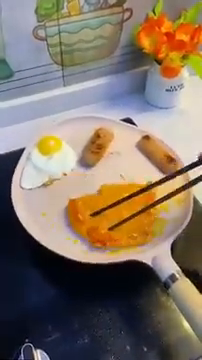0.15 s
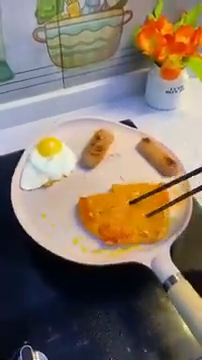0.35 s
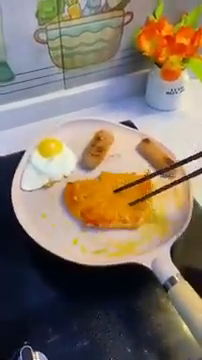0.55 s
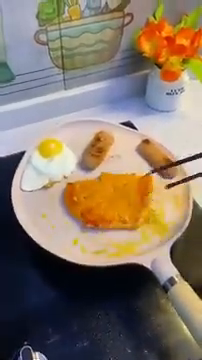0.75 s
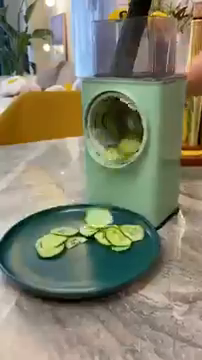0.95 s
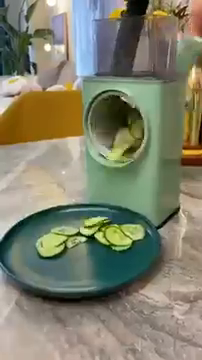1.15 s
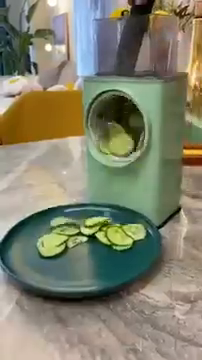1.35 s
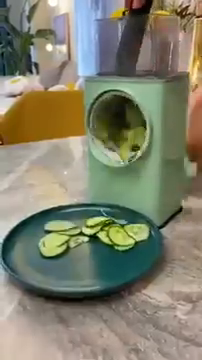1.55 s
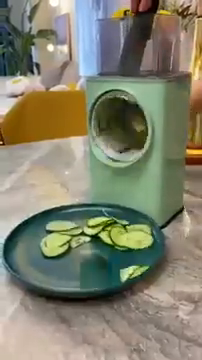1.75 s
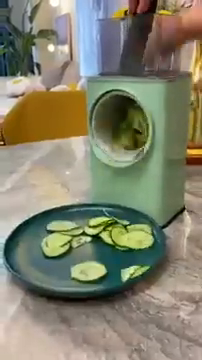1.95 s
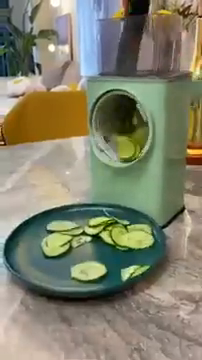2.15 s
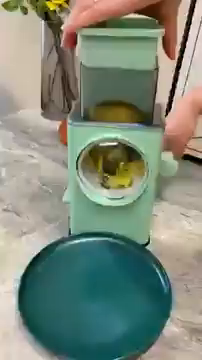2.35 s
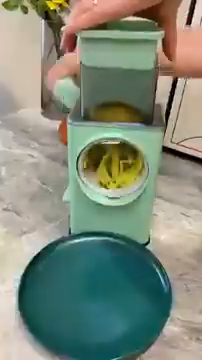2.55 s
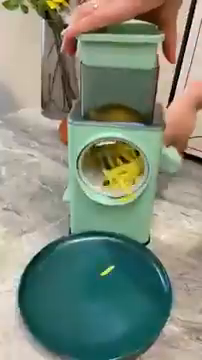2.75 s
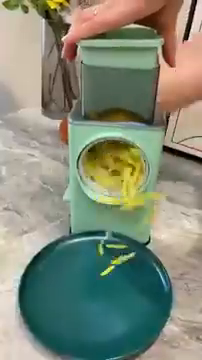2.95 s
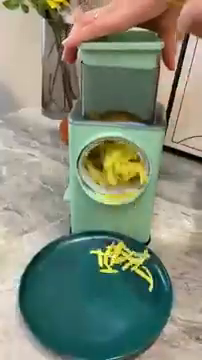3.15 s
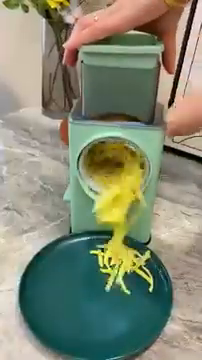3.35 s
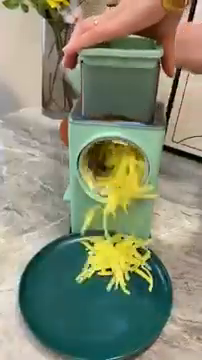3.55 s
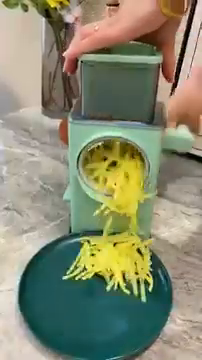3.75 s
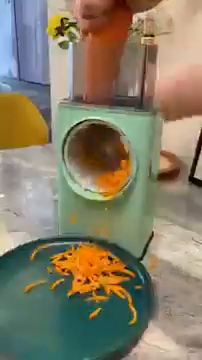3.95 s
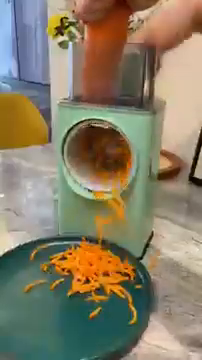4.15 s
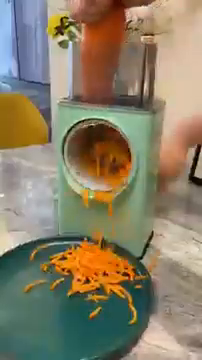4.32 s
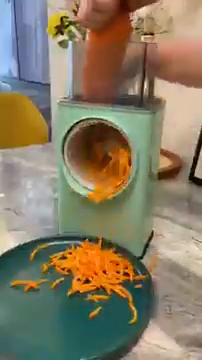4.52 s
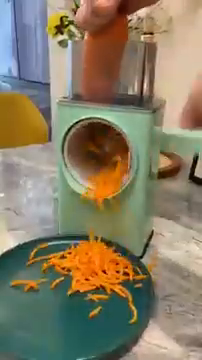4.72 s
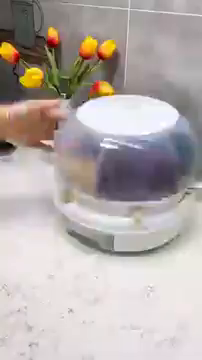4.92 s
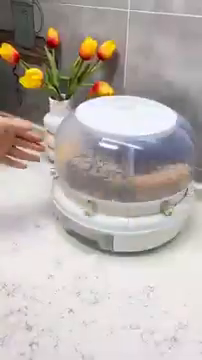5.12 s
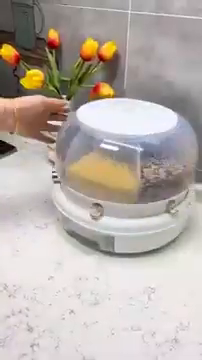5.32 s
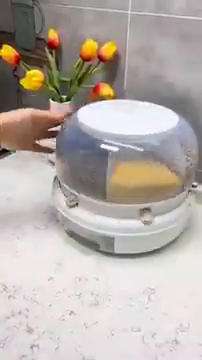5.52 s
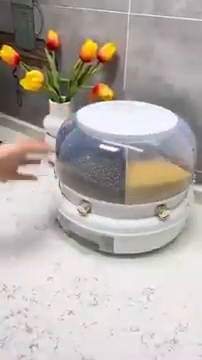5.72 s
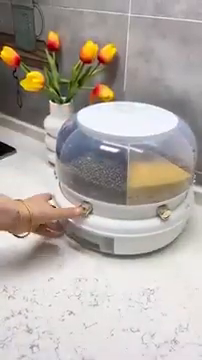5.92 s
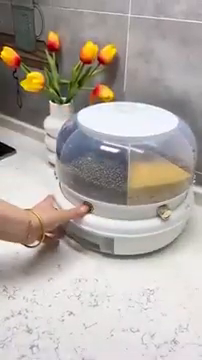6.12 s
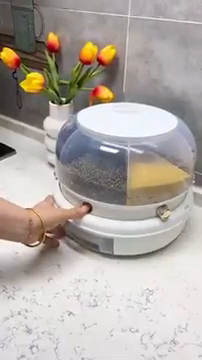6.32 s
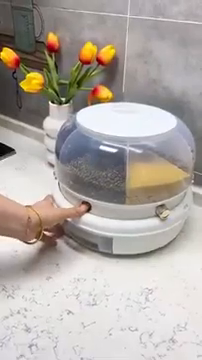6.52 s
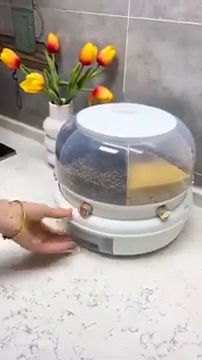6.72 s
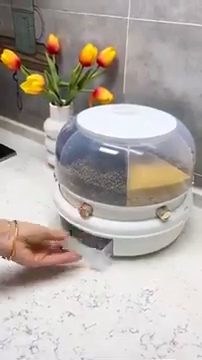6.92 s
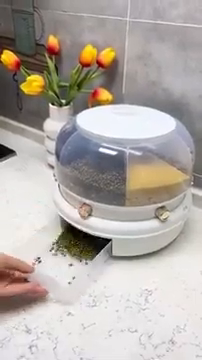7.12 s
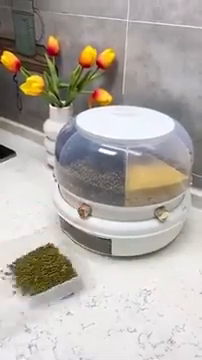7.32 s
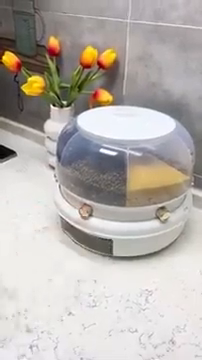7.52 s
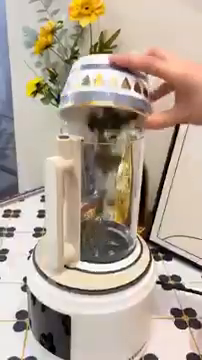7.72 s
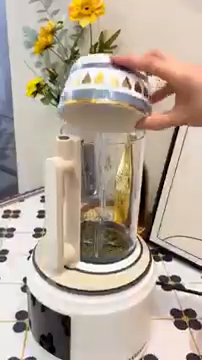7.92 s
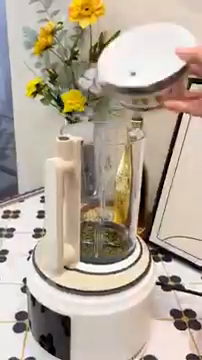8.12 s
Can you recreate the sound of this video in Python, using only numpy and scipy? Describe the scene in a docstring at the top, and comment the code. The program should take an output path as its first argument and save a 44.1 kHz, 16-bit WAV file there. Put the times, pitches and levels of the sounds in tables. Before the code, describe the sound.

Close kitchen sounds: hot fat sizzling, grating strokes growing harsher, a rolling plastic dispenser, beans raining down, drawer knocks, and a bowl squeaking on glass.

```python
"""A hand-cranked drum grater slices cucumber, then shreds potato and carrot, one rasp for each blade pass.
Short kitchen scenes surround it. First a cutlet sizzles as bursting droplets while it is pushed round a pan.
Later a plastic grain dispenser is turned, pours beans into its drawer, and the drawer is pulled out.
Last, a bowl knocks on a glass jug and tips the beans in. Tiny random impacts make the grains and rasps;
ringing bodies make the knocks, and filtered noise makes the low rumble."""
import sys
import numpy as np
from scipy import signal
from scipy.fft import rfft, irfft, next_fast_len
from scipy.io import wavfile
from scipy.ndimage import uniform_filter1d, map_coordinates

SR = 44100
rng = np.random.default_rng(int(sys.argv[2]) if len(sys.argv) > 2 else 0)


def to_wav(sig):
    """Store sig (one row per channel, or 1-D mono) as 16-bit WAV at the path in sys.argv[1].

    Samples outside -1..1 are clipped; the rate is SR.
    """
    pcm = np.clip(np.atleast_2d(sig), -1, 1) * 32767
    pcm = np.round(pcm).astype(np.int16)
    wavfile.write(sys.argv[1], SR, pcm.T)  # frames by channels


N = 360297
TIME = np.arange(N) / SR
SIZE = 2 * next_fast_len(N // 2 + SR // 4)  # transform length, with room for ringing
FREQ = np.fft.rfftfreq(SIZE, 1 / SR)

# tone of the rolling turntable, also heard as the drawer's drumming: pitch_hz [Hz], level_db [dB per Hz]
ROLLING_TONE = [(71, -55), (120, -19), (165, -23), (205, -1.5), (248, 0.5), (290, -7), (330, -4.5),
                (390, -12), (611, -17), (983, -17.5), (1500, -26.5), (1950, -67), (3300, -120)]
# tone of beans striking plastic: pitch_hz [Hz], level_db [dB per Hz]
BEAN_TONE = [(180, -22.5), (300, -40), (392, -15.5), (502, -4), (713, -5.5), (787, 3), (856, -2.5),
             (1230, -1), (1340, -6.5), (2000, 2.5), (2930, 1), (3900, -0.5), (6740, -10.5), (13300, -16.5),
             (16000, -21)]


def amp(db):
    """Turn decibels into gain."""
    return 10 ** (np.asarray(db) / 20)


def unit(x):
    """Scale to an rms of 1."""
    return x / np.sqrt(np.mean(x ** 2) + 1e-20)


def along(points, hz):
    """Read a curve of (Hz, value) points on a log pitch axis."""
    pitch_hz, value = np.transpose(points)
    return np.interp(np.log(hz + 1), np.log(pitch_hz), value)


def wobble(rate):
    """A smooth random curve with the given number of knots a second."""
    knots = rng.standard_normal(int(N * rate / SR) + 4)
    return map_coordinates(knots, [TIME * rate])


def filtered(x, response):
    """Pass x through a frequency response."""
    return irfft(rfft(x, SIZE) * response, SIZE)[..., :N]


def colour(points):
    """A filter with the given (Hz, dB) shape that only rings after a sound, never before it."""
    cepstrum = irfft(np.log(np.maximum(amp(along(points, FREQ)), 1e-6)))
    # folding the second half onto the first puts all the ringing after the hit
    cepstrum[1:SIZE // 2] *= 2
    cepstrum[SIZE // 2 + 1:] = 0
    return np.exp(rfft(cepstrum))


def body(modes):
    """The ringing of an object with (Hz, width Hz, dB) resonances, alternating in sign."""
    response = 0
    for k, (centre, width, db) in enumerate(modes):
        damping = 1j * FREQ * width
        response = response + (-1) ** k * amp(db) * damping / (centre * centre - FREQ ** 2 + damping)
    return response


def grains(response, rate, spread_db, clump_db, clump_rate=90):
    """Tiny impacts, rate a second, of random size and in louder clumps, through a response; rms 1."""
    hits = (rng.random(N) < rate / SR) * np.sign(rng.standard_normal(N))
    spread = spread_db * np.clip(rng.standard_normal(N), -2, 2)
    sizes = amp(spread + clump_db * wobble(clump_rate))
    return unit(filtered(hits * sizes, response))


def shifting(x, depth_db):
    """The colour of x drifts at random in patches of time and pitch; rms 1."""
    spectrum = signal.stft(x, nperseg=1024)[2]
    patches = uniform_filter1d(rng.standard_normal(spectrum.shape), size=7, axis=0)
    patches = uniform_filter1d(patches, size=7, axis=1)
    return unit(signal.istft(spectrum * amp(depth_db * unit(patches)), nperseg=1024)[1][:N])


def swells(rows, attack, release, sag_db_per_s=0):
    """Gain for (start, end, dB) rows: each rises, holds or sags, and dies away; overlaps add in power."""
    power = np.zeros(N)
    for start, end, db in rows:
        age = np.maximum(TIME - start, 0)
        after = np.maximum(TIME - end, 0)
        gain = amp(db - sag_db_per_s * age) * (1 - np.exp(-age / attack)) * np.exp(-after / release)
        power += gain ** 2
    return np.sqrt(power)


def strikes(rows, modes, ring_db, tick_db, tick_t60, chatter, bright):
    """Each contact rings its own mix of modes, chatters for a moment and gives off a bright tick."""
    t = TIME[:SR // 4]
    radiation = 1j * FREQ / (1j * FREQ + 0.65 * modes[0][0])  # a small body gives off little bass
    rings = [(-1) ** k * irfft(body([mode]) * radiation)[:len(t)] for k, mode in enumerate(modes)]
    tick = irfft(colour(bright))[:len(t)]
    out = np.zeros(N + SR)
    for start, db, rel_db, *_ in rows:
        rattle = rng.standard_normal(len(t)) * amp(-60 * t / 0.035)
        snap = rng.standard_normal(len(t)) * amp(-60 * t / tick_t60)
        ring = amp(rng.normal(0, 1.8, len(modes))) @ np.array(rings)
        knock = signal.fftconvolve((t == 0) + chatter * rattle, ring)[:len(t)]
        crack = signal.fftconvolve(snap, tick)[:len(t)]
        here = out[round(start * SR):][:len(t)]
        here += amp(db + ring_db) * knock / abs(knock).max()
        here += amp(db + rel_db + tick_db) * crack / abs(crack).max()
    return out[:N]


def thuds(rows, modes):
    """Soft blows that only ring the given low modes."""
    blows = np.zeros(N)
    for start, db in rows:
        blows[round(start * SR)] = amp(db)
    response = body(modes)
    return filtered(blows, response) / abs(irfft(response)).max()


def plops(rows, t60, plop_db, attack=0.001):
    """Each blow pops in a hollow body as a dying sine at its own pitch."""
    t, out = TIME[:SR // 4], np.zeros(N)
    for start, db, *_, hz in rows:
        fade = amp(db + plop_db - 60 * t / t60) * (1 - np.exp(-t / attack))
        out[round(start * SR):][:len(t)] += fade * np.sin(2 * np.pi * hz * t)
    return out


def background():
    """A low, uneven room rumble, stronger while things are handled, with a few soft bumps."""
    # rumble while things are moved on the worktop: start_s [s], end_s [s], level_db [dB]
    handling = [(2.33, 3.78, -49), (3.78, 4.9, -39), (5.1, 6.1, -40.5), (6.75, 7.48, -43.5),
                (7.56, 8.17, -43.5)]
    # tone of the rumble: pitch_hz [Hz], level_db [dB per Hz]
    rumble_tone = [(21, -25), (35, -12), (82, -7), (144, -7), (169, -11), (207, -10), (612, -15),
                   (1500, -23.5), (1950, -64), (3300, -120)]
    # soft bumps on the worktop: start_s [s], level_db [dB]
    bumps = [(5.983, -35), (7.564, -22.5), (8.074, -25), (8.148, -24.5)]
    # the worktop's resonances: pitch_hz [Hz], width_hz [Hz], level_db [dB]
    worktop = [(50, 25, 3), (81, 24, 10.5), (137, 30, -8)]
    floor_db, uneven_db = -60.5, 3
    level = np.hypot(amp(floor_db), swells(handling, attack=0.004, release=0.027))
    level = level * amp(uneven_db * wobble(18))
    rumble = unit(filtered(rng.standard_normal(N), colour(rumble_tone)))
    return level * rumble + thuds(bumps, worktop)


def pan():
    """Droplets burst in hot fat, more so at each push, and big ones spit; hob rumbles, chopsticks nudge."""
    # rough tone of the bursting droplets: pitch_hz [Hz], level_db [dB per Hz]
    fat_tone = [(120, -31), (200, -13), (262, -6.5), (383, -21.5), (494, -12.5), (560, -14), (734, -0.5),
                (963, -14.5), (1240, -13.5), (1570, -2), (2130, -5), (2600, -5.5), (3170, -2), (3700, -5.5),
                (5360, 0), (7400, -9), (9210, -3), (13500, -6.5), (15000, -13), (16000, -20)]
    # tone of the hob's rumble: pitch_hz [Hz], level_db [dB per Hz]
    hob_tone = [(21, -36), (35, 2.5), (107, -6.5), (146, 3), (215, -18), (258, -6.5), (365, -27),
                (400, -20), (520, -47), (880, -120)]
    # the cutlet pushed into hot fat: start_s [s], end_s [s], level_db [dB]
    presses = [(0.0, 0.048, -19), (0.125, 0.222, -23.5), (0.352, 0.422, -21), (0.51, 0.598, -21),
               (0.652, 0.75, -21)]
    # chopsticks on the pan: start_s [s], level_db [dB], tick_db [dB against the knock]
    nudges = [(0.04, -8, -1.5), (0.213, -6, -5), (0.358, -24.5, 16.5), (0.417, -27, -1), (0.585, -29, -2),
              (0.72, -21, 8)]
    # the pan rocking on the hob: start_s [s], level_db [dB]
    rocks = [(0.047, -14), (0.22, -22.5)]
    # the pan's resonances: pitch_hz [Hz], width_hz [Hz], level_db [dB]
    pan_modes = [(149.4, 12, -6), (199, 24, -9), (733, 37, 2.5), (1530, 120, -13), (3010, 340, -1)]
    end_s, sizzle_db, spits_db, hob_db = 0.7433, -23, -2, -29.5  # spits are set against the fizz
    sag_db_per_s = 10  # the rumble eases as the pan settles
    frying = swells([(0, end_s, 0)], attack=0.00031, release=0.0021)
    heat = frying * np.hypot(amp(sizzle_db), swells(presses, attack=0.00041, release=0.0021))
    fizz = grains(colour(fat_tone), rate=9000, spread_db=2.0, clump_db=0.3)
    spits = grains(colour(fat_tone), rate=420, spread_db=3.5, clump_db=0.5)
    sizzle = shifting(fizz + amp(spits_db) * spits, depth_db=1.7)
    hob = unit(filtered(rng.standard_normal(N), colour(hob_tone)))
    rumble = frying * amp(hob_db - sag_db_per_s * TIME) * hob
    knocks = strikes(nudges, pan_modes, ring_db=2.5, tick_db=5, tick_t60=0.013, chatter=0.1, bright=fat_tone)
    return heat * sizzle + rumble + knocks + thuds(rocks, pan_modes[:2])


def turntable():
    """The bins roll round and coast to rest while grain shifts inside; a hand rustles to the button."""
    # the push on the turntable, which then coasts: start_s [s], end_s [s], level_db [dB]
    spin = [(4.94, 5.24, -34)]
    # the rollers bumping: start_s [s], level_db [dB], pitch_hz [Hz]
    jolts = [(4.952, -24.5, 235), (5.032, -21, 212), (5.102, -23.5, 252), (5.232, -23, 254),
             (5.558, -30, 248)]
    # grain sliding in the bins: start_s [s], end_s [s], level_db [dB]
    shifts = [(5.02, 5.22, -47.5), (5.42, 5.495, -38)]
    # grain trickling all the while: start_s [s], end_s [s], level_db [dB]
    settling = [(4.93, 5.99, -49)]
    # tone of grain in the bins: pitch_hz [Hz], level_db [dB per Hz]
    bin_tone = [(470, -23), (800, -9), (978, -6.5), (1900, -6.5), (2470, -6.5), (3470, -10.5),
                (5500, -10.5), (7930, -21), (9810, -25), (16000, -30)]
    # the hand moving to the button: start_s [s], end_s [s], level_db [dB]
    rustles = [(5.71, 5.82, -46.5), (5.9, 5.95, -50.5)]
    # tone of the moving hand: pitch_hz [Hz], level_db [dB per Hz]
    skin_tone = [(4000, -12), (7500, 3), (12000, -5), (16000, -5)]
    roll = grains(colour(ROLLING_TONE), rate=900, spread_db=1.5, clump_db=1.6, clump_rate=15)
    roll = swells(spin, attack=0.0027, release=0.25) * roll
    bumping = plops(jolts, t60=0.077, plop_db=2.0, attack=0.0031)
    sliding = swells(shifts, attack=0.0075, release=0.036)
    trickling = swells(settling, attack=0.0061, release=0.02)
    grain = grains(colour(bin_tone), rate=7200, spread_db=1, clump_db=0.3)
    grain = amp(1.5) * np.hypot(sliding, trickling) * grain
    rustle = grains(colour(skin_tone), rate=1900, spread_db=1, clump_db=7.5)
    rustle = swells(rustles, attack=0.011, release=0.014) * rustle
    return roll + bumping + grain + rustle


def pour():
    """The shutter opens and beans rain into the drawer, drumming on its floor."""
    # the level dips briefly after the loud latch: start_s [s], end_s [s]
    dips = [(6.116, 6.15)]
    start_s, end_s, pour_db, dip_db = 5.99, 6.712, -17, -3
    opening_s, first_trickle_db, drumming_db = 0.11, -3, -20  # both levels are against full flow
    opening_db = first_trickle_db * np.clip(1 - (TIME - start_s) / opening_s, 0, 1)
    flow = amp(opening_db) * swells([(start_s, end_s, pour_db)], attack=0.0076, release=0.017)
    dip = swells([(start, end, 0) for start, end in dips], attack=0.0018, release=0.0067)
    level = flow * amp(dip_db * dip)
    rain = shifting(grains(colour(BEAN_TONE), rate=4500, spread_db=1, clump_db=0.3), depth_db=1.55)
    drumming = grains(colour(ROLLING_TONE), rate=900, spread_db=1.5, clump_db=0.8)
    return level * (amp(-0.95) * rain + amp(drumming_db) * drumming)


def slips(count):
    """The drawer sticks and slips in evenly spaced knocks: (start s, level dB, tick dB)."""
    start_s, spacing_s, level_db, tick_db = 6.993, 0.015, -14.5, -15.5
    return [(start_s + k * spacing_s, level_db, tick_db) for k in range(count)]


def drawer():
    """Button and shutter knock; each tug makes the drawer judder and sets the beans in it rolling."""
    # pulls on the drawer: start_s [s], end_s [s], rubbing_db [dB], beans_db [dB]
    tugs = [(6.759, 6.873, -38, -35.5), (6.897, 7.048, -31, -42.5), (7.143, 7.288, -37.5, -33),
            (7.387, 7.504, -39, -32.5)]
    # the drawer's edge grinding in its slot: start_s [s], end_s [s], level_db [dB]
    scrapes = [(6.801, 6.83, -18.5), (6.932, 6.944, -20), (6.992, 7.04, -23.5), (7.168, 7.205, -36),
               (7.238, 7.286, -30)]
    # tone of the grinding edge: pitch_hz [Hz], level_db [dB per Hz]
    edge_tone = [(100, -36), (200, 3.5), (330, -3), (450, 2.5), (850, -5.5), (1300, -15), (2200, -13),
                 (2900, -19), (5000, -23), (9000, -58)]
    # tone of beans rolling in the drawer: pitch_hz [Hz], level_db [dB per Hz]
    tray_tone = [(530, -83), (900, -9), (2140, -3), (2790, -9), (3680, -8), (5960, -13), (7860, -17.5),
                 (16000, -32)]
    # beans thrown against the wall as the drawer jerks free: start_s [s], end_s [s], level_db [dB]
    surges = [(7.232, 7.276, -22)]
    # button, shutter and drawer: start_s [s], level_db [dB], tick_db [dB against the knock], pitch_hz [Hz]
    contacts = [(5.845, -29, -8, 864), (5.918, -22, -1, 860), (5.995, -33, -5, 850), (6.742, -25, 7.5, 860),
                (6.801, -7.5, -26, 970), (6.811, -6.5, -29, 223.5), (6.823, -9.5, -25, 223),
                (6.932, -7, -12.5, 760), (6.953, -19, -20, 750), (7.089, -19.5, -19, 376),
                (7.175, -22, -5, 191), (7.187, -18, -6, 424), (7.203, -28, -17, 425), (7.236, -21, -4, 210),
                (7.245, -6, -0.5, 393), (7.273, -15.5, 3, 480), (7.281, -12.5, -12, 205),
                (7.394, -29.5, 5, 420), (7.423, -41, -12, 418), (7.493, -29.5, 4, 430)]
    # the shutter's latch snapping open: start_s [s], level_db [dB], tick_db [dB against the knock]
    latches = [(6.101, -19.5, 9), (6.108, -19, 10)]
    # tone of the latch's tick: pitch_hz [Hz], level_db [dB per Hz]
    snap_tone = [(1000, -6), (3000, 2.5), (6000, 0), (12000, -9), (16000, -10)]
    # resonances of the plastic: pitch_hz [Hz], width_hz [Hz], level_db [dB]
    plastic = [(210, 53, 5.5), (350, 100, 1), (437, 61, 5), (590, 260, -4.5), (875, 116, 1.5),
               (1066, 91, -6), (1360, 200, -5), (1810, 220, -4.5), (2200, 450, -13.5)]
    rubbing = swells([(start, end, db) for start, end, db, _ in tugs], attack=0.014, release=0.019)
    rolling = swells([(start, end, db) for start, end, _, db in tugs], attack=0.01, release=0.19)
    judder = rubbing * grains(body(plastic), rate=400, spread_db=3, clump_db=0.8)
    scrape = grains(colour(edge_tone), rate=1200, spread_db=1.5, clump_db=0.8)
    scrape = swells(scrapes, attack=0.002, release=0.008) * scrape
    beans = rolling * grains(colour(tray_tone), rate=1400, spread_db=3.5, clump_db=1.5)
    surge = grains(colour(BEAN_TONE), rate=1500, spread_db=1, clump_db=1.5)
    surge = swells(surges, attack=0.0055, release=0.011) * surge
    knocks = strikes(contacts + slips(count=4), plastic, ring_db=-2.0, tick_db=3.5, tick_t60=0.032,
                     chatter=0.028, bright=BEAN_TONE)
    knocks = knocks + plops(contacts, t60=0.042, plop_db=-1.0)
    latch = strikes(latches, plastic, ring_db=-1.0, tick_db=7.5, tick_t60=0.016, chatter=0.05,
                    bright=snap_tone)
    heard = swells([(0, tugs[-1][1], 0)], attack=0.01, release=0.0054)  # all fades after the last tug
    return heard * (judder + scrape + beans + surge + knocks + latch)


def squeak():
    """China slips on glass: one short, slightly rough note, choked as the rims part."""
    # the rims catch and squeak until they part: start_s [s], end_s [s], level_db [dB]
    chirps = [(7.667, 7.681, -6.5)]
    pitch_hz = 2197
    phase = 2 * np.pi * pitch_hz * TIME + 0.29 * wobble(400)
    roughness = amp(1.6 * wobble(500))
    return swells(chirps, attack=0.0015, release=0.002) * roughness * np.sin(phase)


def jug():
    """The bowl knocks and squeaks on the rim; beans patter and click on the glass and keep it ringing."""
    # beans sliding from the bowl: start_s [s], end_s [s], level_db [dB at first]
    tips = [(7.63, 7.72, -31), (7.748, 7.935, -18), (7.982, 8.02, -34.5)]
    # loose beans stirring in bowl and jug: start_s [s], end_s [s], level_db [dB]
    stirring = [(7.55, 8.17, -52.5)]
    # tone of beans on glass: pitch_hz [Hz], level_db [dB per Hz]
    glass_tone = [(290, -79), (500, -42), (946, -18), (1600, -13), (2260, -11), (2610, -20), (2810, -10),
                  (3150, -10.5), (4730, -6), (6060, -10.5), (9090, -8), (16000, -10.5)]
    # the glass ringing under the beans: pitch_hz [Hz], width_hz [Hz], level_db [dB]
    rim_modes = [(2270, 61, -3), (2800, 51, -6), (3560, 58, -15), (4300, 44, -18), (4820, 65, 1),
                 (6900, 70, -6), (8970, 64, -1)]
    # the jug's low ring: pitch_hz [Hz], width_hz [Hz], level_db [dB]
    hollow_modes = [(153, 15, -14), (366, 6.5, 12), (960, 40, -1), (1420, 67, -2)]
    # bowl and beans on the jug: start_s [s], level_db [dB], tick_db [dB against the knock]
    contacts = [(7.63, -32, 4.5), (7.65, -29.5, 6), (7.666, -10.5, -11), (7.672, -8, -13),
                (7.683, -8.5, -19), (7.755, -19.5, -1), (7.798, -19, -2), (7.924, -25, 5),
                (7.984, -31.5, 13), (8.085, -44, 11)]
    # resonances of the knocked jug: pitch_hz [Hz], width_hz [Hz], level_db [dB]
    jug_modes = [(700, 30, -17), (792, 42, 2), (1030, 390, -14.5), (1320, 96, -3), (1690, 260, -22),
                 (2220, 98, -7.5), (2540, 56, -10), (4800, 79, -18)]
    # blows that wake the low ring, the first one higher:
    # start_s [s], level_db [dB], t60_s [s to fall 60 dB], pitch_hz [Hz]
    blows = [(7.685, -13, 0.13, 394), (7.79, -17.5, 0.22, 366), (7.92, -35, 0.14, 366)]
    tipping = swells(tips, attack=0.0062, release=0.05, sag_db_per_s=42)  # each slide thins out
    flow = np.hypot(tipping, swells(stirring, attack=0.012, release=0.03))
    patter = grains(colour(glass_tone), rate=7100, spread_db=1, clump_db=1.0)
    clicks = grains(colour(glass_tone), rate=380, spread_db=3, clump_db=0.8)
    beans = amp(0.4) * flow * unit(patter + clicks)
    rim = amp(-8.5) * grains(body(rim_modes), rate=810, spread_db=1, clump_db=8.0)
    hollow = amp(-15.0) * grains(body(hollow_modes), rate=1200, spread_db=1, clump_db=4.0)
    clinks = strikes(contacts, jug_modes, ring_db=-2.0, tick_db=9.0, tick_t60=0.042, chatter=0.05,
                     bright=glass_tone)
    booms = sum(plops([(start, db, hz)], t60, plop_db=-0.7, attack=0.0016) for start, db, t60, hz in blows)
    return beans + tipping * (rim + hollow) + clinks + squeak() + booms


def passes(rows, rise, fall, dips_db, growth, stop):
    """Rasp, housing and thump gains: blades bite, let go and drag between; each grows with effort."""
    drag_per_db = 0.046  # harder cuts drag more pulp between passes: share of the dip filled per dB
    start, end, db = np.transpose(rows)
    bite = sum(np.interp(TIME, [a - rise, a + rise, b - fall, b + fall], [0, 1, 1, 0])
               for a, b in zip(start, end))
    outside = np.maximum(0, np.maximum(start[0] - TIME, TIME - end[-1]))
    turning = np.exp(-(outside / stop) ** 2)
    effort_db = np.interp(TIME, np.ravel([start, end], "F"), np.repeat(db - db.mean(), 2))
    slack = (1 - np.minimum(bite, 1)) * (1 - drag_per_db * effort_db)
    return [turning * amp(db.mean() + grows * effort_db + dip_db * slack)
            for dip_db, grows in zip(dips_db, growth)]


def grate(gains, flesh, housing, cell_rate, chip_rate, clump_db, rasp_db, crunch_db, housing_db, thump_db):
    """Bursting cells hiss, fibres crunch, chips ring the housing, and the cutting force rocks its feet."""
    # tone of the grater rocking on its feet: pitch_hz [Hz], level_db [dB per Hz]
    table_tone = [(41, -51), (70, -13), (92, -15), (120, -4), (139, 7), (156, 1.5), (194, -8), (220, -8),
                  (290, -56), (480, -120)]
    rasp, chips, thump = gains
    tone = colour(flesh)
    hiss = grains(tone, rate=cell_rate, spread_db=1.5, clump_db=clump_db, clump_rate=170)
    crunch = grains(tone, rate=550, spread_db=3, clump_db=1.5, clump_rate=160)
    cells = rasp * shifting(hiss + amp(crunch_db) * crunch, depth_db=1.6)
    shell = grains(body(housing), rate=chip_rate, spread_db=3.0, clump_db=0.6)
    shell = chips * shifting(shell, depth_db=1.5)
    feet = thump * grains(colour(table_tone), rate=400, spread_db=4, clump_db=0.8)
    return amp(rasp_db) * cells + amp(housing_db) * shell + amp(thump_db) * feet


def cucumber():
    """Soft flesh is cut in slices that flick off the drum with a tick and a hollow plop."""
    # blade passes: start_s [s], end_s [s], level_db [dB]
    strokes = [(1.055, 1.12, -40.5), (1.192, 1.248, -39.5), (1.303, 1.365, -36.5), (1.39, 1.452, -37),
               (1.493, 1.578, -37), (1.66, 1.722, -38), (1.765, 1.838, -38.5), (1.903, 1.968, -38.5),
               (2.025, 2.112, -39.5), (2.208, 2.268, -37.5)]
    # tone of the flesh being sliced: pitch_hz [Hz], level_db [dB per Hz]
    flesh = [(300, -11), (650, -6), (1000, 3.5), (1300, -5), (1700, -7), (2000, 1.5), (2610, -2.5),
             (3490, -12), (5460, -9.5), (7220, -11.5), (11000, -16), (14800, -20), (16000, -23)]
    # resonances of the loaded housing: pitch_hz [Hz], width_hz [Hz], level_db [dB]
    housing = [(286, 126, -6), (417, 310, -4), (547, 150, -3.5), (770, 140, -3.5), (1000, 180, -4.5),
               (1340, 260, -17)]
    # slices flicked off: start_s [s], level_db [dB], tick_db [dB against the knock], pitch_hz [Hz]
    flicks = [(0.805, -28, -15, 364), (0.951, -56.5, 7.5, 385), (1.061, -31, -13, 986),
              (1.169, -26, -15, 850), (1.197, -21.5, -14, 986), (1.212, -25, -17, 960),
              (1.307, -19, -15, 920), (1.321, -25, -16, 520), (1.336, -22, -20, 787),
              (1.39, -23, -21, 1030), (1.412, -20, -30, 380), (1.419, -22, -22, 917),
              (1.436, -19.5, -20, 950), (1.497, -28, -16, 930), (1.525, -24, -17, 910),
              (1.665, -23.5, -18, 970), (1.768, -28, -13, 925), (1.792, -40, -12, 940),
              (1.915, -34, -16, 930), (2.06, -27.5, -9, 840), (2.094, -33.5, 4, 740),
              (2.209, -21.5, -14, 900), (2.248, -17.5, -11.5, 1284), (2.282, -23, -13, 1010),
              (2.319, -21, -11, 990), (2.329, -17, -12.5, 905)]
    # the drum rubs on after a cut: start_s [s], end_s [s], level_db [dB]
    coasting = [(0.79, 0.86, -50.5)]
    gains = passes(strokes, rise=0.009, fall=0.029, dips_db=[-8, -13, -9], growth=[1, 1.4, 1.3], stop=0.055)
    cutting = grate(gains, flesh, housing, cell_rate=1800, chip_rate=600, clump_db=1.5,
                    rasp_db=-0.8, crunch_db=-3, housing_db=0.7, thump_db=-5.0)
    slices = strikes(flicks, housing, ring_db=-3.5, tick_db=11, tick_t60=0.017, chatter=0.1, bright=flesh)
    slices = slices + plops(flicks, t60=0.039, plop_db=1.5)
    rub = grains(colour(flesh), rate=5000, spread_db=3, clump_db=0.6)
    return cutting + slices + swells(coasting, attack=0.016, release=0.043) * rub


def potato():
    """Wet flesh is shredded in long even strokes; the sound stops short during the last one."""
    # blade passes: start_s [s], end_s [s], level_db [dB]
    strokes = [(2.352, 2.44, -27.5), (2.492, 2.618, -28), (2.67, 2.795, -24), (2.825, 2.96, -21.5),
               (2.997, 3.128, -20), (3.155, 3.293, -19.5), (3.324, 3.465, -19.5), (3.5, 3.638, -18),
               (3.66, 3.785, -18)]
    # rough tone of the flesh being shredded: pitch_hz [Hz], level_db [dB per Hz]
    flesh = [(590, -31.5), (1000, -6), (1240, -8), (1420, -6), (1820, -4.5), (2670, -0.5), (3830, -9),
             (4330, -5), (5250, -1), (6650, -3), (7520, -15), (8300, -4), (10000, -6.5), (13000, -7),
             (14800, -13), (16000, -28)]
    # resonances of the loaded housing: pitch_hz [Hz], width_hz [Hz], level_db [dB]
    housing = [(247, 65, -4), (357, 37, -3), (454, 70, 1.5), (606, 180, -5.5), (798, 100, -2.5),
               (930, 100, -9), (1188, 140, -6.5), (1830, 320, -5.5), (2500, 400, -9)]
    end_s = 3.768
    gains = passes(strokes, rise=0.023, fall=0.023, dips_db=[-22, -17, -8], growth=[1, 1.1, 0.5], stop=0.018)
    cutting = grate(gains, flesh, housing, cell_rate=9000, chip_rate=1100, clump_db=1.3,
                    rasp_db=-1.23, crunch_db=-2, housing_db=-4.0, thump_db=-10.5)
    return cutting * swells([(0, end_s, 0.008)], attack=0.001, release=0.0029)


def carrot():
    """Hard flesh is shredded in jerks, catching and cracking on the blades."""
    # blade passes: start_s [s], end_s [s], level_db [dB]
    strokes = [(3.808, 3.908, -18.5), (3.972, 4.052, -20), (4.105, 4.218, -21), (4.288, 4.378, -20.5),
               (4.447, 4.528, -20.5), (4.615, 4.728, -20.5), (4.768, 4.892, -22)]
    # rough tone of the snapping flesh: pitch_hz [Hz], level_db [dB per Hz]
    flesh = [(650, -14.5), (1100, -3.5), (1490, -4.5), (1700, -0.5), (2140, -1), (2650, 0), (3840, -5.5),
             (5270, -3), (6800, -5.5), (7620, -13.5), (8590, -5), (13100, -10.5), (14800, -18),
             (16000, -26)]
    # resonances of the loaded housing: pitch_hz [Hz], width_hz [Hz], level_db [dB]
    housing = [(256, 51, -5), (360, 91, -1), (507, 140, -5.5), (618, 65, -3), (760, 96, 1.5),
               (898, 225, -5.5), (1070, 71, -8.5), (1294, 160, -12.5), (2640, 160, -12)]
    # the carrot briefly loses its grip on the drum: start_s [s], end_s [s]
    lifts = [(3.908, 3.968)]
    # catching and cracking: start_s [s], level_db [dB], tick_db [dB against the knock], pitch_hz [Hz]
    catches = [(3.786, -13.5, 2, 755), (3.809, -17, 4.5, 760), (3.816, -28, 5, 506), (3.83, -6.5, 5, 719),
               (3.895, -6.5, -5, 740), (3.977, -9.5, -11, 723), (3.992, -6.5, -15, 1070),
               (4.106, -12, 2, 361), (4.134, -6, -6, 744), (4.294, -5, -4, 718), (4.389, -7.5, -4, 447),
               (4.455, -10.5, -1.5, 877), (4.477, -12, -2, 720), (4.555, -10.5, 1.5, 748),
               (4.619, -8, 0, 760), (4.713, -12, -14, 821), (4.722, -8, -2.5, 450), (4.772, -14, 5, 883),
               (4.805, -13, 5.5, 433), (4.857, -13, -2, 830), (4.886, -10.5, -4.5, 646)]
    lift_db = -6  # drop in level meanwhile
    gains = passes(strokes, rise=0.0029, fall=0.026, dips_db=[-5.5, -3, -3], growth=[1, 0.1, 0.1], stop=0.0022)
    cutting = grate(gains, flesh, housing, cell_rate=7600, chip_rate=700, clump_db=0.3,
                    rasp_db=-0.7, crunch_db=-2, housing_db=-2.5, thump_db=-5.5)
    lifted = swells([(start, end, 0) for start, end in lifts], attack=0.0011, release=0.0033)
    cracks = strikes(catches, housing, ring_db=-3.5, tick_db=2.5, tick_t60=0.018, chatter=0.06, bright=flesh)
    cracks = cracks + plops(catches, t60=0.052, plop_db=-2.0)
    return cutting * amp(lift_db * lifted) + cracks


def grater():
    """Each vegetable goes through the drum in turn, and hard bites jolt the grater on its feet."""
    # hard bites that jolt it: start_s [s], level_db [dB]
    lurches = [(1.525, -29), (3.985, -15), (4.215, -18), (4.335, -13), (4.472, -19), (4.798, -19)]
    # resonance of the feet: pitch_hz [Hz], width_hz [Hz], level_db [dB]
    feet = [(134, 14, 0)]
    return cucumber() + potato() + carrot() + thuds(lurches, feet)


def room(x, scatter_t60, near_db, tail_db, size=12288):
    """Near surfaces scatter sound left and right, redrawn patch by patch; walls add a faint tail."""
    # stereo width: pitch_hz [Hz], side_db [dB, side minus mid]
    width_points = [(60, -33), (140, -27), (300, -8), (700, -4.5), (1400, -4), (3000, 0.5), (7000, 0.5),
                    (15000, -1.5)]
    # how long the kitchen rings: pitch_hz [Hz], t60_s [s to fall 60 dB]
    kitchen = [(200, 0.73), (2000, 0.38), (12000, 0.13)]
    t, hz = TIME[:size], np.fft.rfftfreq(2 * size, 1 / SR)
    width = amp(along(width_points, hz))
    echo = width * amp(near_db)
    padded = np.pad(x, (size, 2 * size))
    near = np.zeros((2, len(padded)))
    fade = np.clip(9 * (1 - abs(np.linspace(-1, 1, size))) - 4, 0, 1)  # patches cross-fade
    for start in range(0, N + size, size // 2):
        scatter = rfft(rng.standard_normal((2, size)) * amp(-60 * t / scatter_t60), 2 * size)
        # many small surfaces even out the colour
        scatter = unit(abs(scatter) ** .5) * np.exp(1j * np.angle(scatter))
        direct = rfft(padded[start:start + size] * fade, 2 * size)
        # reflections interfere with the direct sound and comb the treble
        middle = (1 + echo * scatter[0]) / np.hypot(1, echo)
        mid, side = irfft(direct * [middle, width * scatter[1]])[:, :size + size // 2]
        near[:, start:start + len(mid)] += [mid + side, mid - side]
    hz, t, noise = signal.stft(rng.standard_normal((2, SR // 2)), SR, nperseg=256)
    decay = amp(-60 * t / along(kitchen, hz)[:, None])
    tail = signal.istft(noise * decay, SR, nperseg=256)[1]
    walls = filtered(x, rfft(tail / np.linalg.norm(tail[0]), SIZE))
    return near[:, size:size + N] + amp(tail_db) * walls


def scene():
    """All the kitchen sounds in one small room."""
    dispenser = turntable() + pour() + drawer()
    sounds = background() + pan() + dispenser + jug() + grater()
    return room(sounds, scatter_t60=0.051, near_db=1.0, tail_db=-22.0)


def record(dry):
    """The highest peaks are rounded off, and nothing is kept above the band limit."""
    top_hz = 16000
    rounded = dry / (1 + abs(dry) ** 6) ** (1 / 6)
    return filtered(rounded, FREQ < top_hz)


dry = scene()
out = record(dry)
to_wav(out)
```